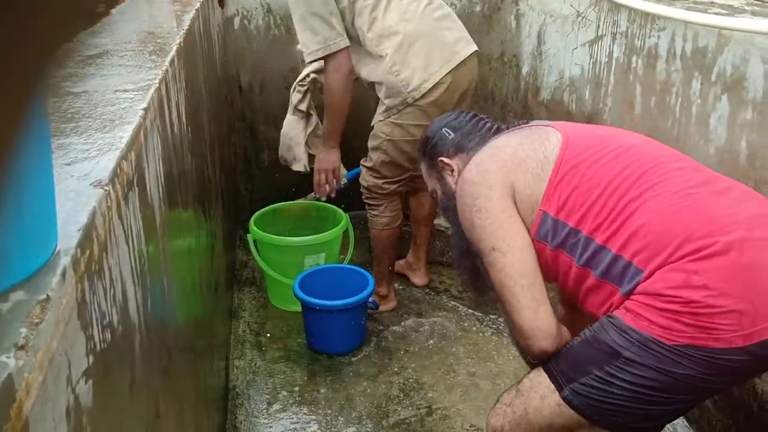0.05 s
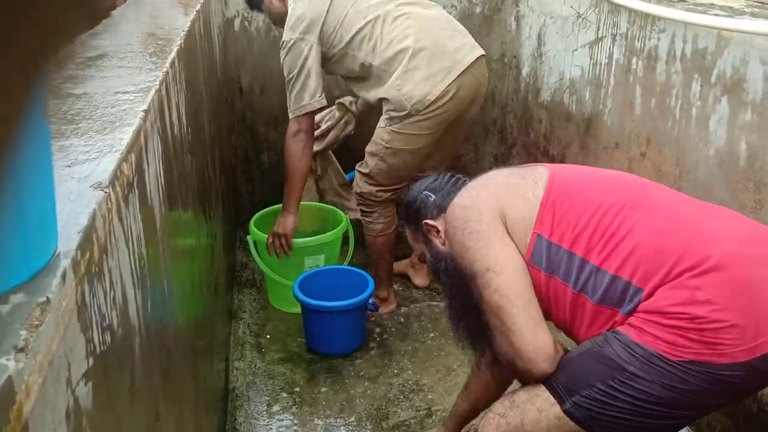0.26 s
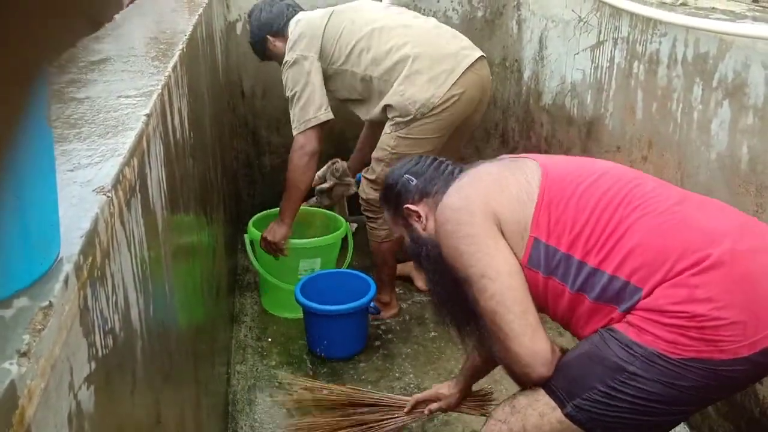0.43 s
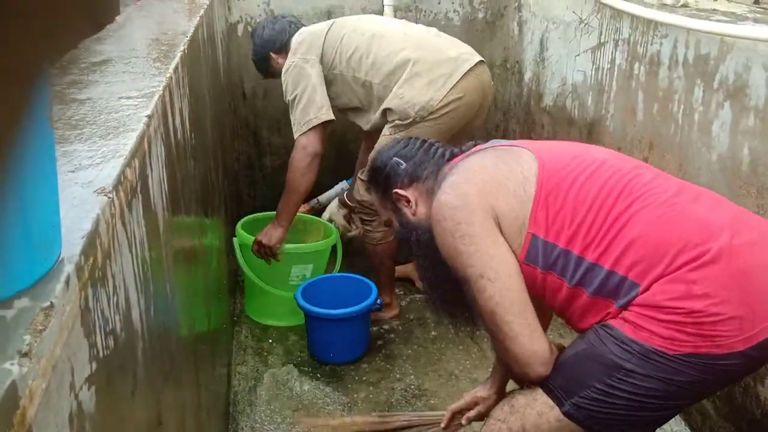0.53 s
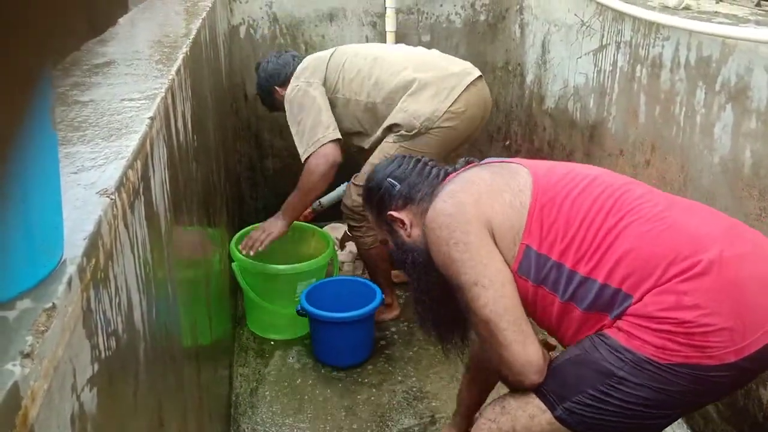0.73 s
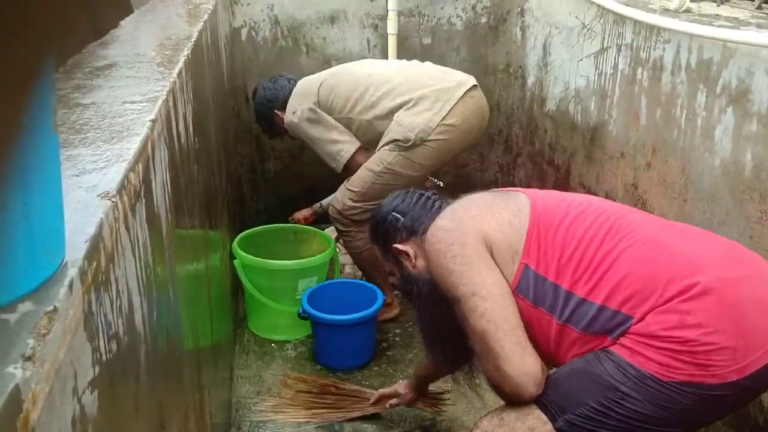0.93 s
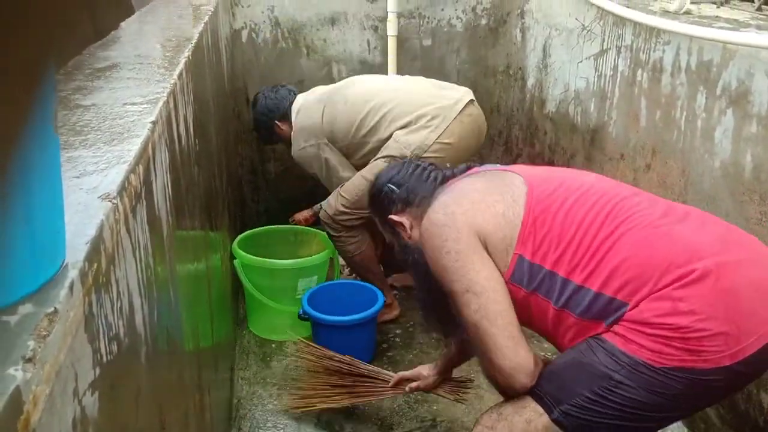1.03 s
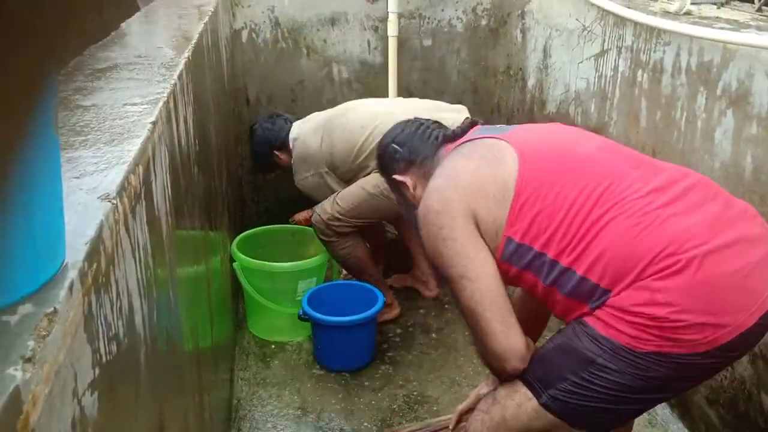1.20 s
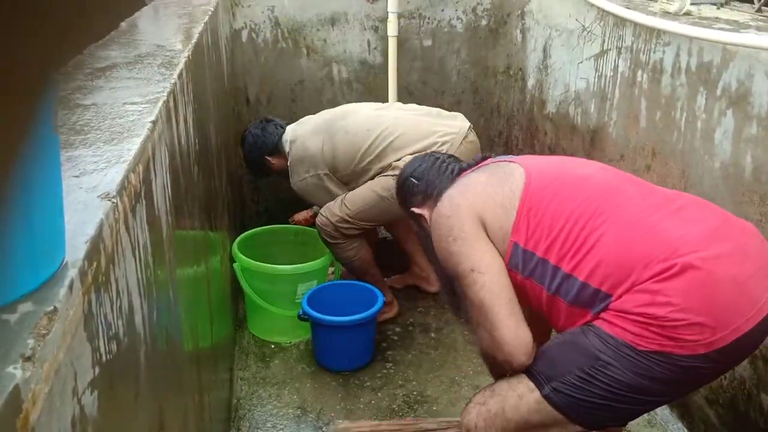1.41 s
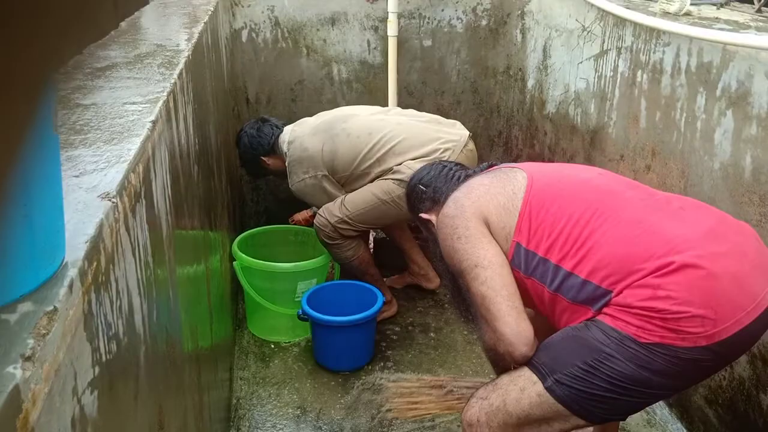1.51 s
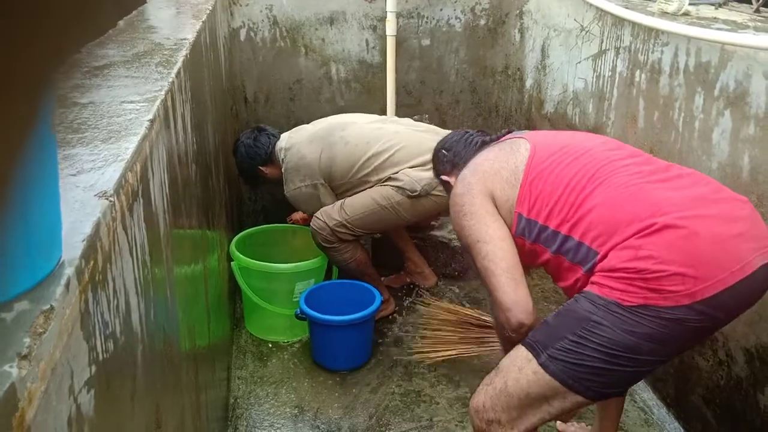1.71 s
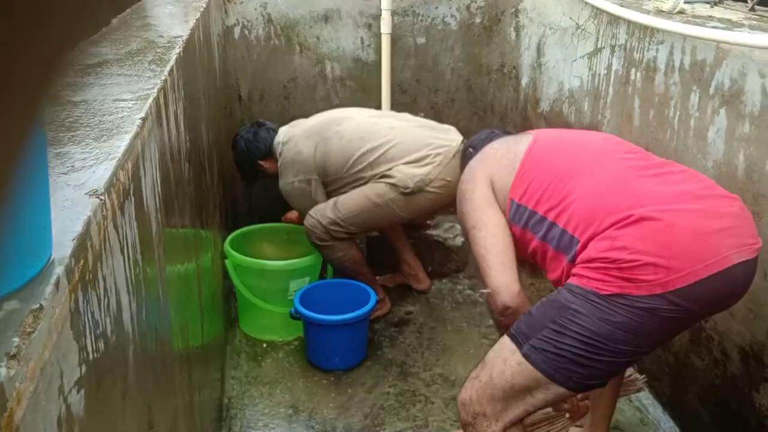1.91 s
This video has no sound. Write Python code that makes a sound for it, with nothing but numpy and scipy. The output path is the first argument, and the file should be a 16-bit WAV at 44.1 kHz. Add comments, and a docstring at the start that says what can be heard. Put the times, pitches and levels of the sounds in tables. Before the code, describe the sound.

A stiff stick broom sweeps wet concrete close by, with strokes at about 0.3, 0.9 and 1.5 seconds, each swelling as a hiss and ending in a lower rasp. Plastic buckets are tapped and bumped, loudest at 0.6 seconds and again around 1.3, ringing low between the tank walls. A small wet plop comes at 1.9 seconds as a fourth stroke begins. Faint outdoor air lies underneath.

```python
"""Sweeping a wet concrete tank

A stiff stick broom sweeps the floor of an open water tank: three strokes and the start of a fourth.
The bristles hiss as they flick over the grit and rasp lower as they are pressed down. Behind it,
plastic buckets are bumped and tapped, and low notes ring between the concrete walls.
Near the end comes one wet plop. Soft outdoor noise lies under it all."""
import sys
import numpy as np
from scipy import signal
from scipy.fft import rfft, irfft
from scipy.io import wavfile
from scipy.ndimage import map_coordinates

SR = 44100
rng = np.random.default_rng(int(sys.argv[2]) if len(sys.argv) > 2 else 0)


def store_pcm(level_fs):
    """Save levels as 16-bit WAV."""
    pcm = np.round(np.clip(level_fs, -1, 1) * 32767).astype(np.int16)
    wavfile.write(sys.argv[1], SR, np.atleast_2d(pcm).T)


N = 85995
T = np.arange(N) / SR


def from_db(db):
    """Turn decibels into a number to multiply by."""
    return 10 ** (np.asarray(db) / 20)


def unit_power(x):
    """Scale a signal to an average power of 1."""
    return x / np.sqrt(np.mean(x ** 2) + 1e-20)


def across_pitch(points):
    """Join (frequency, value) points into a curve over all frequencies."""
    hz, values = np.transpose(points)
    return np.interp(np.log(np.fft.rfftfreq(N, 1 / SR) + 1e-9), np.log(hz), values)


def colour(x, spectrum):
    """Give a noise its tone; the spectrum sets the balance, not the loudness."""
    return unit_power(irfft(rfft(x) * from_db(across_pitch(spectrum)), N))


def low_cut(x, hz):
    """Take out the bass below hz."""
    return signal.sosfilt(signal.butter(3, hz, "high", fs=SR, output="sos"), x)


def drift(hz):
    """A smooth random wobble of about size 1; more hz makes it quicker."""
    r = np.exp(-2 * np.pi * hz / SR)
    return unit_power(signal.lfilter([1], [1, -2 * r, r * r], rng.standard_normal(2 * N))[N:])


def dying(start, fade_s):
    """Jump to 1 at start, then die away. A fade time is how long a 60 dB drop takes."""
    return (T >= start) * from_db(-60 * np.maximum(T - start, 0) / fade_s)


def ring(hits, notes):
    """Hits (time, level) make an object ring at its own notes, a little differently each time."""
    out = np.zeros(N)
    for k, (hz, note_db, fade_s) in enumerate(notes):
        blows = np.zeros(N)
        for t, db in hits:   # neighbouring notes swing opposite ways
            blows[int(t * SR)] += (-1) ** k * from_db(db + note_db + rng.normal(0, 1))
        r, w = from_db(-60 / (fade_s * SR)), 2 * np.pi * hz / SR   # shrink and turn per sample
        out += signal.lfilter([0, np.sin(w)], [1, -2 * r * np.cos(w), r * r], blows + 1e-18)
    return out


def rattle(hits, bands, fade_s):
    """Each hit (time, level) is a burst of chatter that shakes the plastic in a few pitch bands."""
    force = sum(from_db(db) * dying(t, fade_s) for t, db in hits)
    out, power = 0, 0
    for hz, width, db in bands:
        narrow, wide = [hz - width / 2, hz + width / 2], [hz / 2, hz * 1.31]
        sos = np.vstack([signal.butter(1, b, "band", fs=SR, output="sos") for b in (narrow, wide)])
        chatter = signal.sosfilt(sos, force * rng.standard_normal(N))
        out += from_db(db) * np.sqrt(SR / (np.pi * width)) * chatter
        power += from_db(db) ** 2
    return out / np.sqrt(power)


# How alike the two ears hear sound from all around: f/Hz, likeness (1 = the same)
EAR_LIKENESS = [(60, 1), (150, .95), (300, 0.72), (550, 0.88), (1000, 0), (16000, 0)]

def surrounding_noise():
    """Noise from all sides: alike in both ears in the bass, unrelated in the treble."""
    alike = across_pitch(EAR_LIKENESS)
    shared, side = rfft(rng.standard_normal((2, N)))
    return unit_power(irfft(np.sqrt(1 + alike) * shared + np.sqrt(1 - alike) * side * [[1], [-1]], N))


def with_echoes(x, echo_db, fade_s):
    """Add a wash of echoes from the concrete walls; the treble dies sooner."""
    first_echo_s, treble_hz = 0.0027, 9700
    echoes = surrounding_noise()
    dull = signal.sosfilt(signal.butter(1, treble_hz, fs=SR, output="sos"), echoes)
    tail = dull * dying(first_echo_s, fade_s) + (echoes - dull) * dying(first_echo_s, fade_s / 2)
    tail = unit_power(tail) / np.sqrt(N)
    return x + from_db(echo_db) * signal.fftconvolve(np.atleast_2d(x), tail, axes=1)[:, :N]


# Tone of the outdoor background: f/Hz, level/dB (levels in all tables are relative)
AIR_TONE = [(25, -22), (60, 0), (130, -0.5), (350, 2), (600, -5), (850, -2.5), (1010, 4.5), (1150, -6),
            (1400, -8), (1700, -0.5), (1930, 2), (2150, -10), (2500, -1), (3500, -16.5), (5600, -3.5),
            (8000, -25.5), (16000, -20.5)]

def outdoor_air():
    """A faint, steady rush from all around."""
    return from_db(-51.5) * colour(surrounding_noise(), AIR_TONE)


# Three quick pulses that blend into one plop: t/s, level/dB
PLOP_HITS = [(1.883, -37.5), (1.888, -39.5), (1.893, -36)]
# The notes in the plop: f/Hz, level/dB, fade/s
PLOP_NOTES = [(423, 1, 0.042), (542, -4.5, 0.096), (722, -2, 0.056), (928, 2.5, 0.025), (1880, -2, 0.03)]

def plop():
    """A short wet plop nearby: a few notes that die almost at once."""
    return with_echoes(low_cut(ring(PLOP_HITS, PLOP_NOTES), hz=287), echo_db=-5.5, fade_s=0.14)


# Bumps of the big bucket: t/s, then level/dB of tank boom, base thud, wall knock and rim clack
BUCKET_BUMPS = [(0.327, -44, -43, -37, -46), (0.385, -41, -48, -34.5, -62), (0.503, -43, -39.5, -27, -34),
                (0.524, -45, -39, -34, -35), (0.534, -45, -34.5, -31, -31.5), (0.556, -54, -62, -31.5, -47),
                (0.6363, -22, -26.5, -16.5, -19.5), (0.654, -31.5, -31.5, -35, -49),
                (0.683, -53, -37.5, -29, -32.5), (0.731, -33, -29, -26.5, -35.5),
                (1.238, -51, -40.5, -38, -61.5), (1.265, -36.5, -33, -38, -55),
                (1.285, -36.5, -44, -56, -57), (1.385, -34.5, -33, -28, -29.5),
                (1.426, -59, -41, -39.5, -46)]
# Taps on a smaller plastic tub: t/s, ring level/dB, click level/dB
TUB_TAPS = [(0.056, -45, -67), (0.0776, -33, -30.5)]
# Where the bucket's parts and the tub rattle: f/Hz, width/Hz, level/dB
BASE_BANDS = [(127, 68, -7.5), (233, 57, -6.5), (345, 90, -3.5)]
WALL_BANDS = [(424, 60, -5.5), (840, 120, -4), (990, 220, -3)]
RIM_BANDS = [(1500, 140, -20), (1860, 370, 1), (2440, 550, -2.5), (5410, 610, -6)]
TUB_BANDS = [(1050, 200, -7), (1930, 310, -8), (2410, 460, -1), (5200, 700, -12)]
# The notes they ring at: f/Hz, level/dB, fade/s
BASE_NOTES = [(114, -11, 0.15), (154.4, -9.5, 0.37), (338, -8, 0.35), (355.2, 0.5, 0.21)]
WALL_NOTES = [(706, -13.5, 0.11), (782, -0.5, 0.042), (872, -11.5, 0.11), (944, -4, 0.079),
              (1023.6, -5, 0.12)]
RIM_NOTES = [(1475, -2.5, 0.018), (1747, -2.5, 0.072), (1870, -0.5, 0.03), (2330, -15, .05),
             (2495, -14, 0.085)]
TUB_NOTES = [(229.3, -11.5, 0.58), (272, -10, 0.26), (323.5, 0.5, 0.35), (1062, -19, 0.079)]
# Low notes of sound bouncing between the tank walls (standing waves): f/Hz, level/dB, fade/s
TANK_NOTES = [(78, -40, 0.38), (175.5, -0.5, 0.8), (221.8, 3, 0.53), (298, -18, 0.22), (357.7, -23.5, 0.87),
              (425, -6.5, 0.64)]

def buckets():
    """Struck plastic rattles and rings; bumps of the big bucket also make the tank boom."""
    booms, thuds, knocks, clacks = [[(row[0], row[k]) for row in BUCKET_BUMPS] for k in range(1, 5)]
    base = rattle(thuds, BASE_BANDS, fade_s=0.13) + from_db(-2) * ring(thuds, BASE_NOTES)
    wall = from_db(-4.5) * rattle(knocks, WALL_BANDS, fade_s=0.045)
    wall += from_db(-5.5) * ring(knocks, WALL_NOTES)
    rim = from_db(-4.5) * rattle(clacks, RIM_BANDS, fade_s=0.057)
    rim += from_db(-6) * ring(clacks, RIM_NOTES)
    tub_click = rattle([(t, db) for t, _, db in TUB_TAPS], TUB_BANDS, fade_s=0.045)
    tub_ring = low_cut(ring([(t, db) for t, db, _ in TUB_TAPS], TUB_NOTES), hz=195)
    plastic = with_echoes(base + wall + rim + tub_click, echo_db=-1, fade_s=0.31)
    tank_boom = from_db(-5) * ring(booms, TANK_NOTES)
    return low_cut(plastic + tank_boom + tub_ring, hz=83)   # plastic gives off little deep bass


def bristles(tone):
    """Thousands of tiny flicks of uneven size; the bristles catch and let go in bunches."""
    flicks_per_s, spread_db, bunch_db = 9000, 2.5, 2
    sizes = from_db(spread_db * np.minimum(rng.exponential(1, N), 5))
    directions = rng.choice([-1, 1], N)
    flicking = rng.random(N) < flicks_per_s / SR
    bunches = from_db(bunch_db * drift(hz=140))
    return colour(sizes * directions * flicking * bunches, tone)


# How each full stroke swells and fades, one list each: t/s, hiss level/dB, rasp level/dB
BROOM_STROKES = [
    [(0.15, -51, -58.5), (0.2, -41.5, -57), (0.238, -24.5, -33), (0.286, -16.5, -25), (0.326, -14.5, -27),
     (0.352, -24, -25.5), (0.436, -34, -31.5), (0.48, -51, -53)],
    [(0.755, -48.5, -54), (0.782, -34, -54), (0.81, -27, -37.5), (0.845, -19.5, -30.5), (0.915, -19.5, -26),
     (0.95, -23.5, -28.5), (1.004, -25, -27.5), (1.065, -53, -52.5), (1.12, -49.5, -54)],
    [(1.24, -52, -66), (1.314, -41.5, -51), (1.356, -50.5, -55.5), (1.4, -32, -46), (1.438, -24.5, -35.5),
     (1.514, -20.5, -25), (1.634, -23.5, -23.5), (1.682, -32.5, -47), (1.72, -58, -53.5)],
]
# Light touches of the broom, then the start of the fourth stroke: same columns
BROOM_TOUCHES = [
    [(0, -49, -63), (0.025, -68, -55.5), (0.06, -74, -73)],
    [(0.5, -51, -50.5), (0.55, -54.5, -53), (0.61, -63, -60.5)],
    [(1.76, -59, -53), (1.82, -57.5, -52.5), (1.9, -57.5, -56)],
    [(1.92, -55, -53), (1.938, -33, -52), (1.95, -40, -42)],
]
# Tone of flicking bristles (hiss) and of pressed ones (rasp): f/Hz, level/dB
HISS_TONE = [(1500, -39), (2800, -10.5), (3700, -16.5), (4400, -7), (5200, -1.5), (6100, -1.5), (7000, -12),
             (8200, -19.5), (9700, -28), (11200, -23), (12500, -25.5), (14000, -19), (16000, -23.5)]
RASP_TONE = [(30, -48), (60, -35), (120, -25.5), (220, -27.5), (420, -21), (600, -20.5), (950, -11),
             (1300, -13.5), (1650, -6), (2050, 3), (2320, 5), (2580, 5.5), (2900, 0), (3300, -1.5),
             (4000, -1.5), (6000, -29.5)]

def broom():
    """Each stroke swells as a hiss and ends in a lower rasp; the wide fan of bristles swings past."""
    lift_db_per_s = 288   # fade before and after a stroke
    sag_octaves_per_s = 0.3   # the rasp sinks as the bristles bend
    ear_lag_s, swing_s = 0.000502, 0.61   # longest delay between the ears, time of one swing
    width = 0.69   # share of the flicks heard on one side only
    hiss, rasp, octaves = np.zeros((3, N))
    for stroke in list(BROOM_STROKES) + list(BROOM_TOUCHES):
        times, hiss_db, rasp_db = np.transpose(stroke)
        lift_db = -lift_db_per_s * np.abs(T - np.clip(T, times[0], times[-1]))
        hiss = np.maximum(hiss, from_db(np.interp(T, times, hiss_db) + lift_db + 1.5))
        rasp = np.maximum(rasp, from_db(np.interp(T, times, rasp_db) + lift_db + 2))
        middle_s = np.average(times, weights=from_db(rasp_db))
        octaves = np.where(lift_db == 0, -sag_octaves_per_s * (T - middle_s), octaves)
    bent_clock = np.cumsum(2 ** octaves)   # reading the noise more slowly lowers it
    fan = []
    for _ in range(3):
        hissing = hiss * bristles(HISS_TONE)
        rasping = rasp * map_coordinates(bristles(RASP_TONE), [bent_clock], order=3, mode="wrap")
        fan.append(hissing + rasping)
    centre, left, right = fan
    lag_s = ear_lag_s * np.sin(2 * np.pi * T / swing_s)
    lagged = map_coordinates(centre, [(T - lag_s) * SR], order=3)
    both_ears = np.sqrt(1 - width) * np.array([centre, lagged])
    both_ears += np.sqrt(width) * np.array([left, right])
    return with_echoes(both_ears, echo_db=-6, fade_s=0.24)


def scene():
    """A plop, the broom and the buckets over a quiet background."""
    return plop() + broom() + buckets() + outdoor_air()


def record(dry):
    """Cut the highest treble and make the left side slightly louder."""
    top_hz = 15900
    treble_cut = signal.ellip(12, .1, 80, top_hz, fs=SR, output="sos")
    return signal.sosfilt(treble_cut, dry) * from_db([[.3], [-.3]])


dry = scene()
out = record(dry)
store_pcm(out)
```